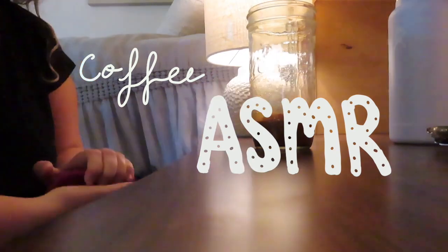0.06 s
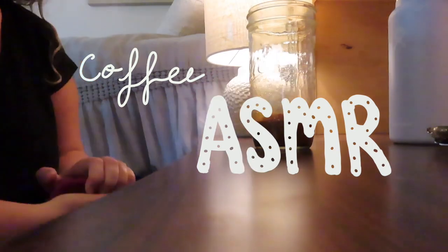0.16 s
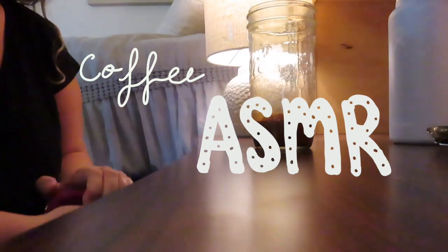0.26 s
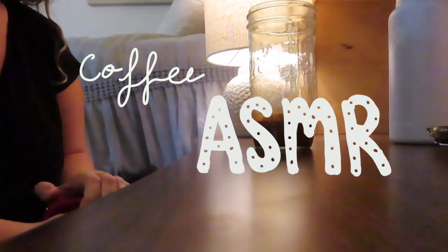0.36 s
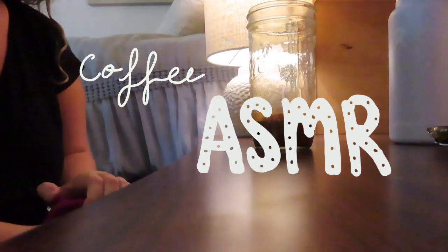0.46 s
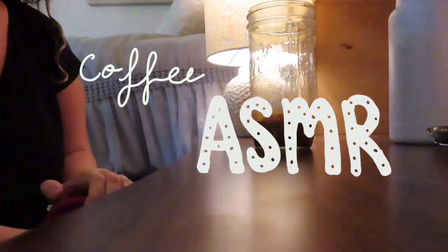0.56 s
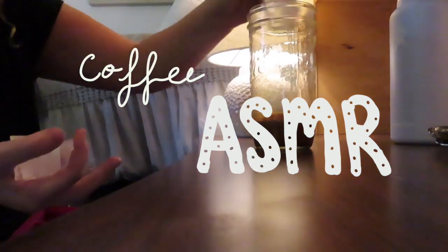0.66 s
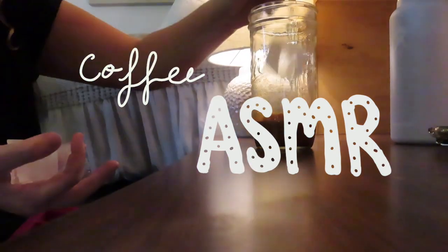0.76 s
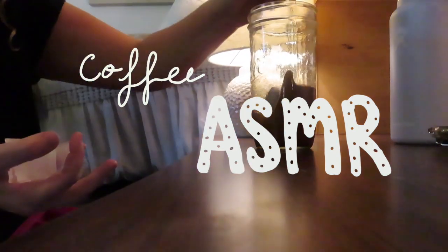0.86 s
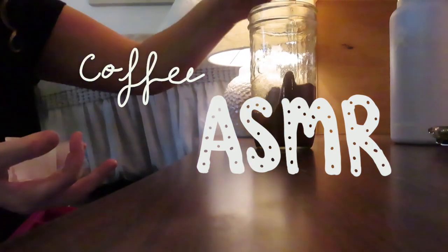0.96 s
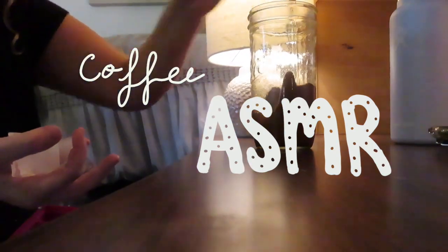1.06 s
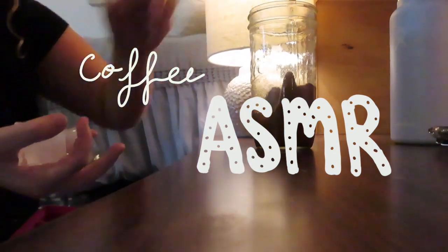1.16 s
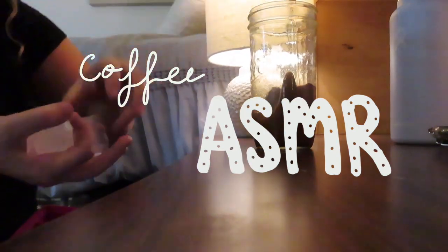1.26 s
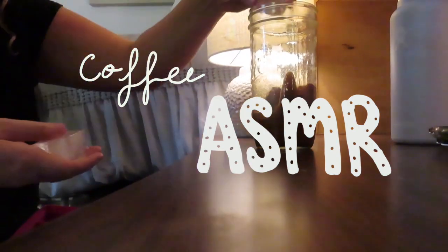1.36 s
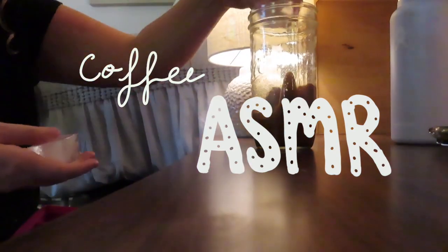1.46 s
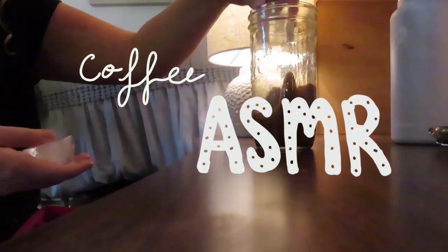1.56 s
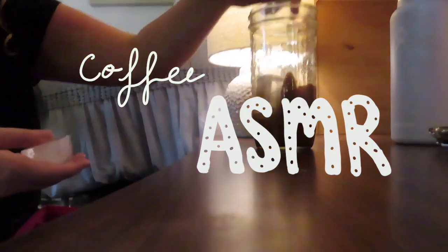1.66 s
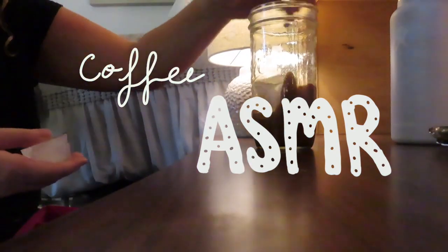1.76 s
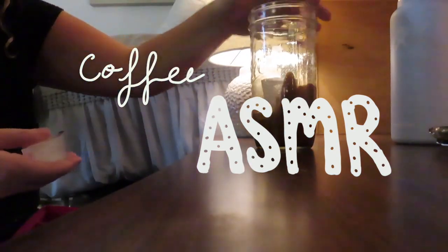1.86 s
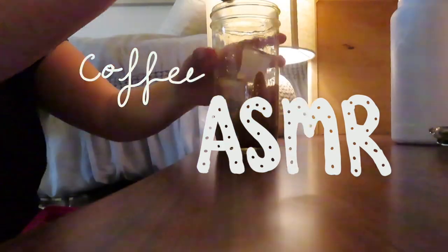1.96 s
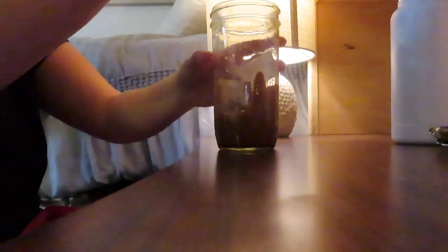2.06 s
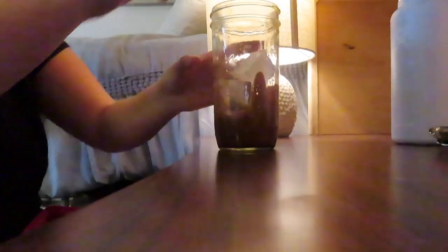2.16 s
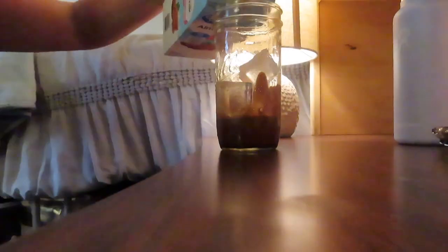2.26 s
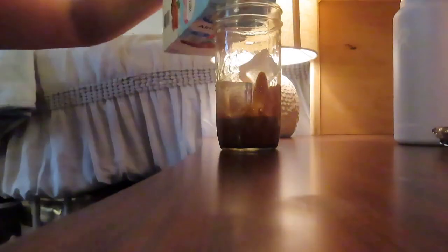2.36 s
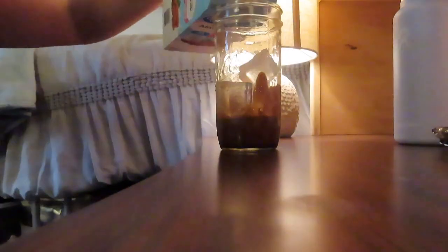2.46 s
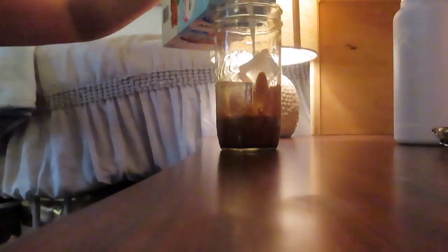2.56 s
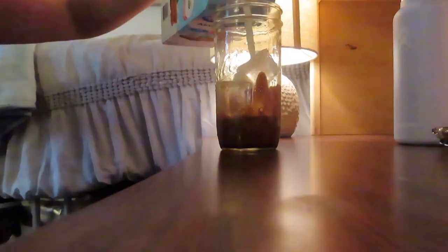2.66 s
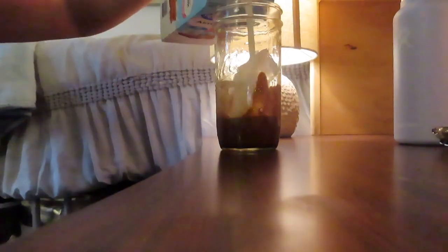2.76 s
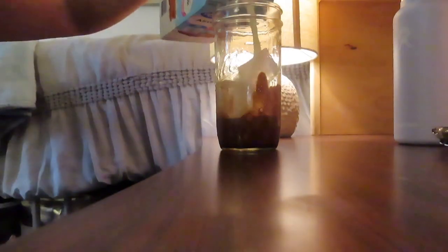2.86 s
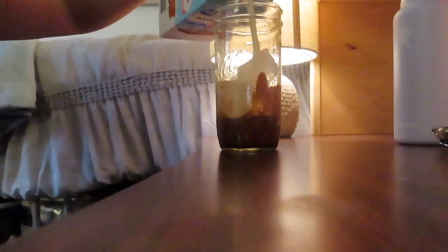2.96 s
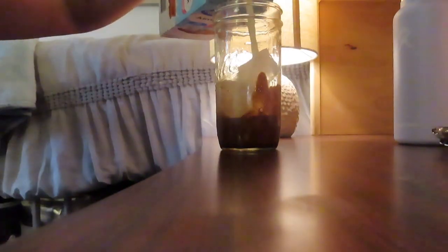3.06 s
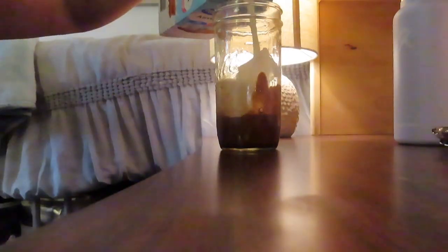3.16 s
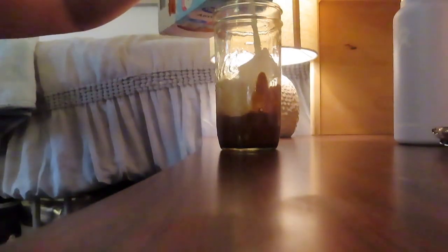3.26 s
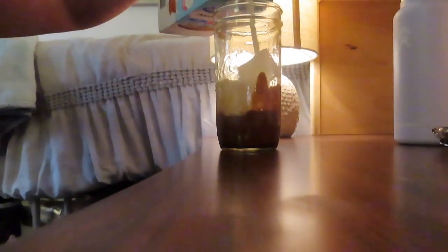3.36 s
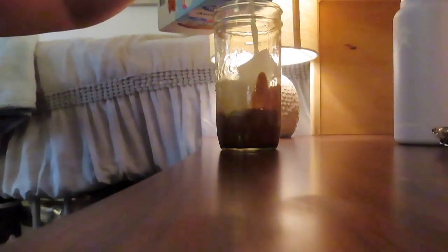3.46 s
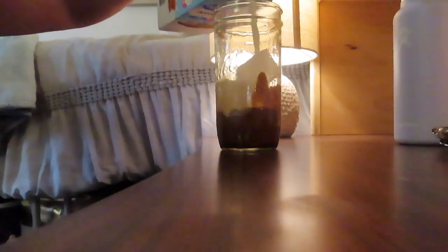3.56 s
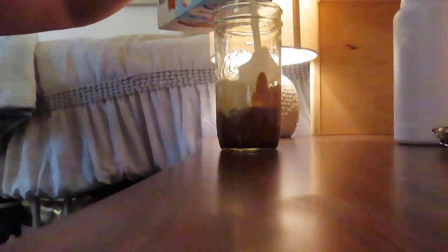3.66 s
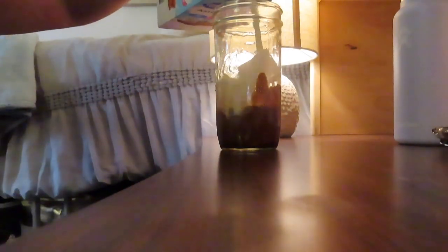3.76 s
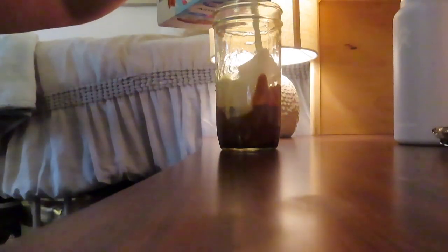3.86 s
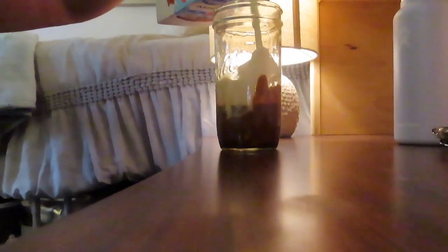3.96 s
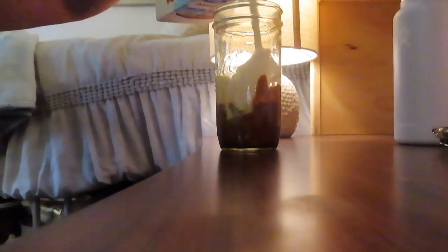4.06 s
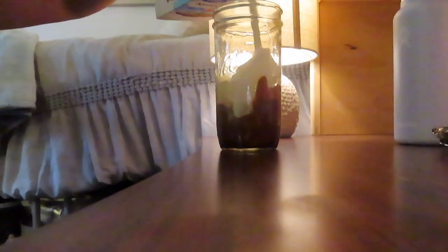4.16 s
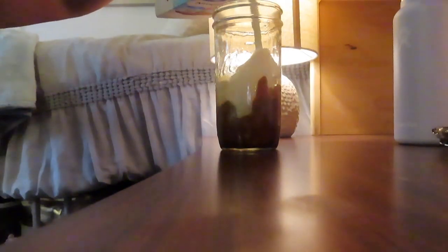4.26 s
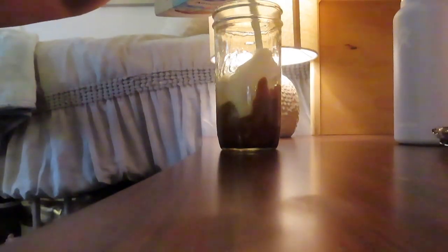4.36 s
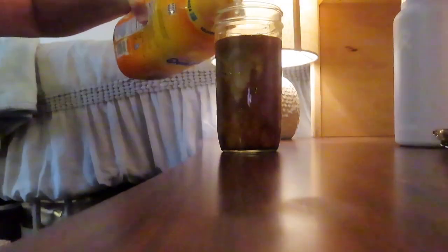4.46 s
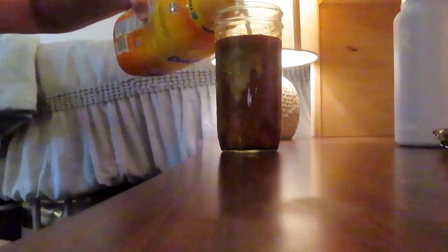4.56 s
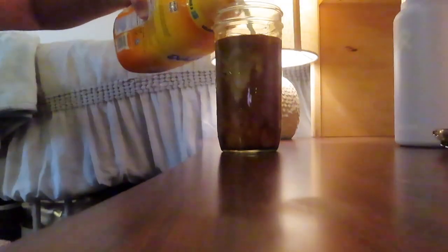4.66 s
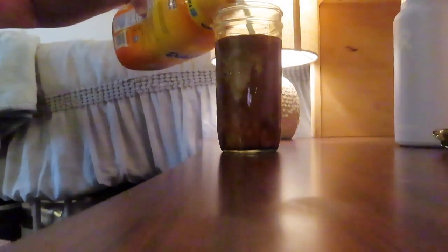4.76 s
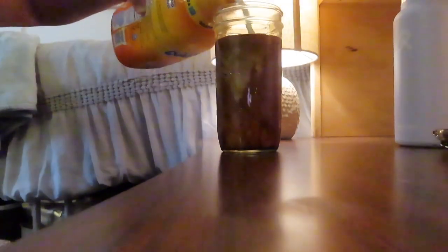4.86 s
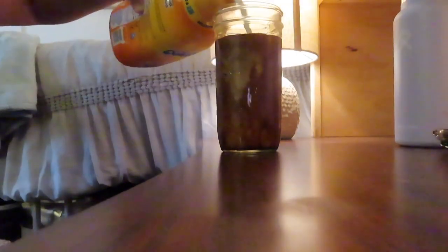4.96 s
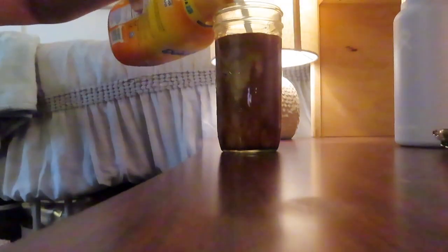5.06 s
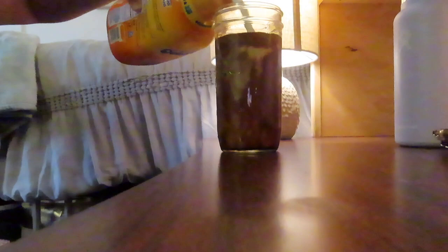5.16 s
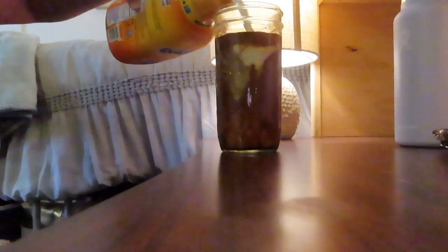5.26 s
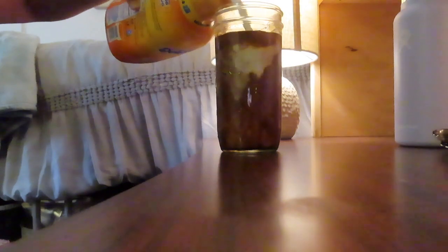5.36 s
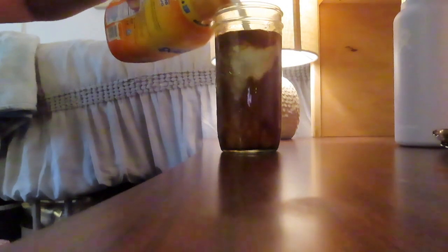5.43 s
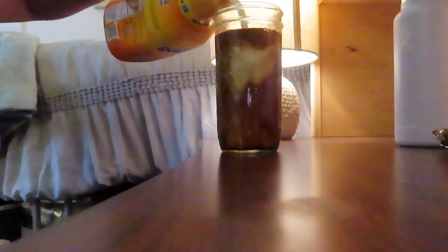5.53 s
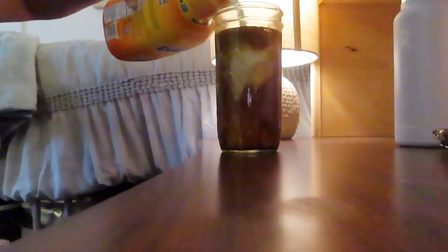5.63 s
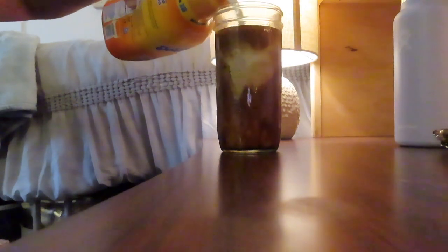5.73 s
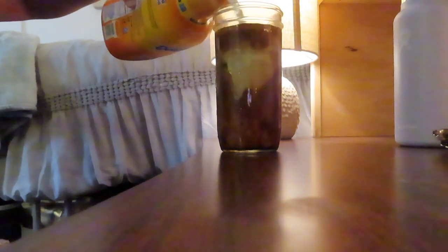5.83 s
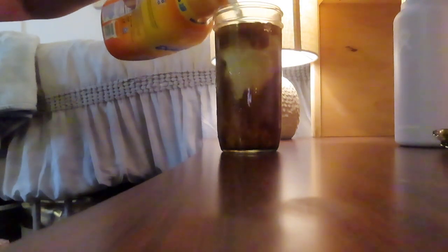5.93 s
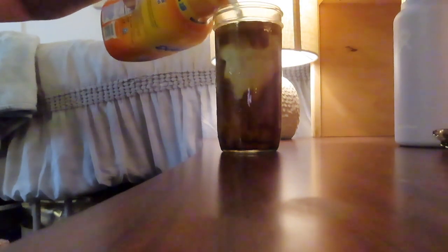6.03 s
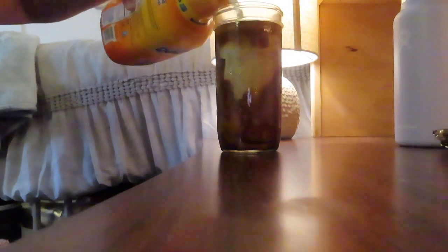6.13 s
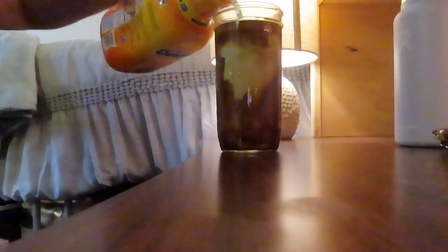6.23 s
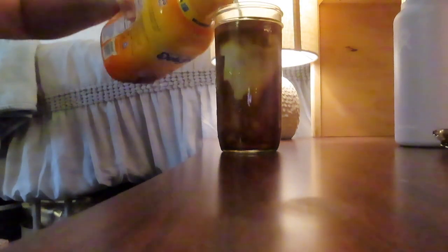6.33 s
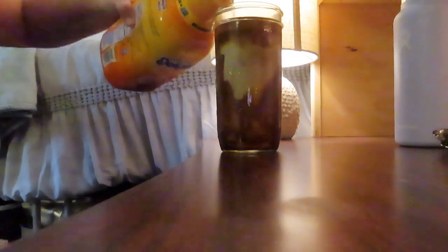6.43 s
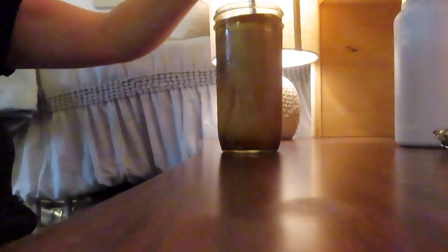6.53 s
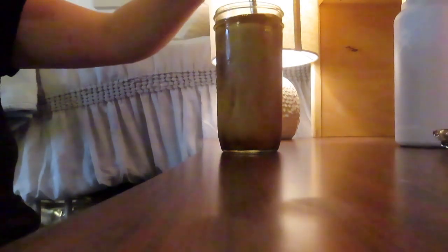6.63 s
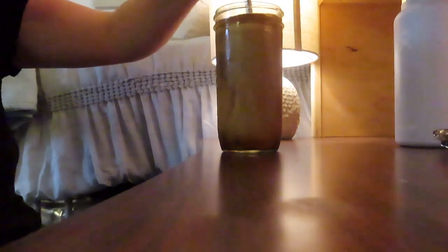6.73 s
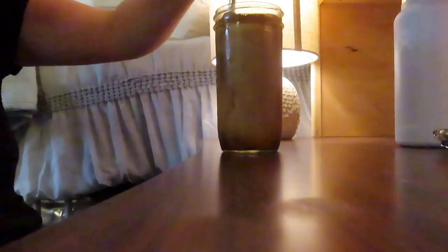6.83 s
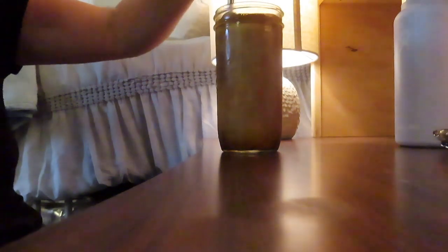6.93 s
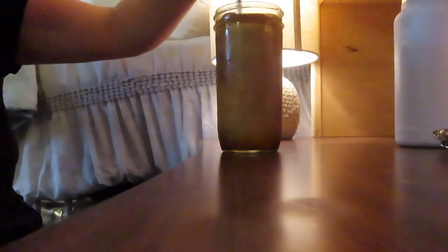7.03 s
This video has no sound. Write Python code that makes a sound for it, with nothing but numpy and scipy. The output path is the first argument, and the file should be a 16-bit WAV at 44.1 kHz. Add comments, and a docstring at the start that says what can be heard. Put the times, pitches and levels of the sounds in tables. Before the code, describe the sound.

Close ice cracks, two ringing drops into a glass jar, faint bubbles and snaps, then a few wooden knocks in a small humming room.

```python
"""Ice cubes in a glass jar

Ice cubes clack loose and drop into a glass jar on a wooden desk, close to the microphone.
They knock on the bottom and ring the glass wall: noise clicks are filtered and joined by fading tones.
Milk runs into the coffee almost silently: a few bubbles are rising tones, tiny snaps are short noise.
Things are set down on the desk with dry knocks. A fan hums in the small room: shaped noise and steady tones."""
import sys
import numpy as np
from scipy import signal
from scipy.fft import rfft, irfft
from scipy.io import wavfile

SR = 44100
rng = np.random.default_rng(int(sys.argv[2]) if len(sys.argv) > 2 else 0)


def materialize(psi):
    """Save the field psi as 16-bit PCM at rate SR to the path in sys.argv[1].

    A 1-D psi becomes a single channel; in a 2-D psi each row is a channel.
    """
    bounded = np.clip(np.atleast_2d(psi).T, -1, 1)
    quanta = np.round(bounded * 32767).astype(np.int16)
    wavfile.write(sys.argv[1], SR, quanta)


N = 312889
TIME = np.arange(N) / SR  # seconds through the whole scene
AGE = TIME[:SR // 2]  # seconds since one short sound began


def amp(db):
    """Turns decibels into gain."""
    return 10 ** (np.asarray(db) / 20)


def unit(x):
    """Scales a sound to an rms of 1."""
    return x / np.sqrt(np.mean(x ** 2) + 1e-20)


def noise():
    """White noise as long as one short sound."""
    return rng.standard_normal(len(AGE))


def read(points, hz):
    """Reads a table between its points, on a log-frequency axis."""
    f, value = np.transpose(points)
    return np.interp(np.log(hz + 1), np.log(f + 1), value)


def add(track, s, sound):
    """Mixes a sound into the track at s seconds."""
    part = track[max(round(s * SR), 0):][:len(sound)]
    part += sound[:len(part)]


def fade(t60):
    """A free decay: it falls by 60 dB in t60 seconds, with a floor of 2 ms on that time."""
    return 10 ** (-3 * AGE / np.maximum(t60, 0.002))


def tone(hz):
    """A sine that starts at a random phase."""
    return np.sin(2 * np.pi * (hz * AGE + rng.random()))


def band(x, hz, kind, order=2):
    """Low-, high- or band-pass filter that never sounds ahead of its input."""
    sections = signal.butter(order, np.minimum(hz, SR / 2 - 1), kind, fs=SR, output="sos")
    return signal.sosfilt(sections, x)


def colour(x, spectrum, size=4096):
    """Gives a sound the listed spectrum with a filter that responds as early as it can."""
    hz = abs(np.fft.fftfreq(size, 1 / SR))
    log_gain = np.log(amp(np.maximum(read(spectrum, hz), -90)))
    # the Hilbert transform supplies the minimum phase
    response = np.fft.ifft(np.exp(np.conj(signal.hilbert(log_gain)))).real[:size // 2]
    return signal.fftconvolve(x, response)[:len(x)]


def at_level(x, db, size=441):
    """Sets the rms level of a sound's first 10 ms."""
    return amp(db) * x / np.sqrt(np.mean(x[:size] ** 2) + 1e-20)


def blow(spectrum, modes, t60, scatter_db, modes_db, grain_db=0):
    """A hit body: a click, a dense wash of dying vibration that may be grainy, and clear ringing modes."""
    grain = amp(grain_db * np.clip(unit(band(noise(), 506, "low")), -2, 2))
    scatter = noise() * fade(t60) * grain
    scatter = amp(scatter_db) * scatter / np.linalg.norm(scatter)
    click = colour((AGE == 0) + scatter, spectrum)
    ring = sum(amp(db) * fade(life) * tone(hz) for hz, db, life in modes)
    ring = ring * (1 - fade(0.035))  # the modes build up gradually
    return at_level(click, 0) + at_level(ring, modes_db)


CRACK_T60 = 0.086  # decay of the clack's wash (s)
CRACK_GRAIN_DB = 2.5  # breaking ice crackles unevenly
# Ice cracking loose. Each row: start in seconds, body level in dB before a fixed trim, treble level in dB.
CRACKS = [(0.031, -35, -45), (0.09, -35, -30.5), (0.101, -15, -27), (0.188, -8, -30), (0.2, -21, -42),
          (0.296, -19, -29), (0.309, -28, -37), (0.338, -8.5, -46), (0.348, 0, -35), (0.362, -5, -21.5),
          (0.37, -25, -48), (0.45, -25, -60)]
# Colour of the ice clicks. Each row: frequency in Hz, relative level in dB.
ICE_COLOUR = [(120, -42), (200, -48), (394, -13), (590, -1), (1060, -6.5), (1320, -8), (1500, -0.5),
              (1870, -0.5), (2090, 1), (2860, -4.5), (4430, -14), (8270, -12.5), (9930, -15),
              (11300, -13.5), (16000, -24)]
# Ringing notes of the ice. Each row: frequency in Hz, relative level in dB, 60 dB decay time in seconds.
ICE_MODES = [(592, 5.5, 0.082), (886, -29, 0.14), (1030, -38, 0.25), (2005, 0.5, 0.18), (2140, 3, 0.077),
             (2560, -17, 0.077), (2840, -4.5, 0.03), (3000, -9, 0.021)]


def ice_cracks():
    """Cubes break loose: a hollow clack of ringing ice with a shorter, bright snap on top."""
    out = np.zeros(N)
    for s, body_db, treble_db in CRACKS:
        clack = blow(ICE_COLOUR, ICE_MODES, CRACK_T60,
                     scatter_db=8.5, modes_db=-20, grain_db=CRACK_GRAIN_DB)
        snap = blow(ICE_COLOUR, ICE_MODES, CRACK_T60 * 0.51,
                    scatter_db=6, modes_db=-35, grain_db=CRACK_GRAIN_DB)
        add(out, s, at_level(band(clack, 3400, "low"), body_db - 10.5))
        add(out, s, at_level(band(snap, 4550, "high", order=4), treble_db))
    return out


BOOM_LONGER = 1.23  # the boom's wash dies this many times more slowly than the knock's
THUD_TICK_DB = -18  # treble, relative to strength
# Cubes landing on the jar's bottom; the row at 0.679 is the first landing's lingering boom.
# Each row: start in seconds, strength in dB before a fixed trim, boom level in dB,
# 60 dB decay time of the knock's wash in seconds.
THUDS = [(0.644, 2, -15.5, 0.023), (0.679, -37, -23, 0.66), (0.853, -12.5, -21.5, 0.061),
         (0.868, -16.5, -23.5, 0.05), (0.915, -28, -28.5, 0.31), (1.691, 3.5, -14, 0.05),
         (1.712, -6, -27, 0.094), (1.775, -8, -24, 0.12), (1.861, -22.5, -21, 0.069),
         (1.915, -18.5, -28.5, 0.043), (1.997, -8.5, -20.5, 0.12), (2.042, -13, -21.5, 0.05),
         (2.067, -9.5, -19.5, 0.035)]
# Colour of the jar and desk top together. Each row: frequency in Hz, relative level in dB.
BASE_COLOUR = [(35, -33), (60, -3.5), (212, -13.5), (315, 10.5), (503, -6), (862, 2), (1010, -10),
               (1310, -5.5), (1780, 0), (2090, -12), (3760, -17), (5210, -34), (5590, -26.5), (12700, -40),
               (16000, -41)]
# Their ringing notes. Each row: frequency in Hz, relative level in dB, 60 dB decay time in seconds.
BASE_MODES = [(90, -2, 0.08), (134, -1.5, 0.15), (195.5, -8, 0.15), (274, -2, 0.089), (345.7, 0.5, 0.11),
              (488, 0, 0.087), (596.6, 4, 0.093), (641, -14.5, 0.38), (910, 7, 0.052), (1210, -4.5, 0.086),
              (1598, 2.5, 0.042)]


def thuds():
    """A cube lands and jar and desk top boom together; strength lifts the knock and treble over the boom."""
    out = np.zeros(N)
    for s, db, boom_db, t60 in THUDS:
        boom = blow(BASE_COLOUR, BASE_MODES, t60 * BOOM_LONGER, scatter_db=13, modes_db=0)
        knock = blow(BASE_COLOUR, BASE_MODES, t60, scatter_db=1.5, modes_db=-8.5)
        tick = blow(BASE_COLOUR, BASE_MODES, t60, scatter_db=-3.5, modes_db=-42)
        add(out, s, at_level(band(boom, [70, 560], "band"), boom_db))
        add(out, s, at_level(band(knock, [620, 1650], "band"), db - 12))
        add(out, s, at_level(band(tick, 1960, "high"), db + THUD_TICK_DB))
    return out


def dulled_db(contact, corner):
    """Loss of high-pitched sound when a contact lasts longer than the corner time."""
    return -10 * np.log10(1 + (contact / corner) ** 2)


CHATTER_PER_S, CHATTER_DB, CHATTER_T60 = 250, -16, 0.28  # bounces per second, level in dB, decay in s


def chatter():
    """After a touch the cube chatters: a dying train of tiny bounces shakes the higher modes again."""
    bounces = noise() * (rng.random(len(AGE)) < CHATTER_PER_S / SR)
    return (AGE == 0) + amp(CHATTER_DB) * bounces * fade(CHATTER_T60)


NOTE_HZ, BEAT_HZ = 1785, 13.2  # the wall's lowest mode, and how far its twin lies above it
BRUSH_S = 0.04  # a brushing contact this long wakes the twin fully, so the ring beats
SINK_PER_S = 2  # a cube works its way from the rim (0) to the low wall (1) at this speed
TICK_DB, TICK_CONTACT_S = -14, 0.0025  # tick relative to the lowest mode; longer contacts lose it
TOP_DB, TOP_CONTACT_S = -2.5, 0.0033  # trim of modes above 6.5 kHz; longer contacts dull them
PARTNER, DETUNE_HZ = 0.47, 18  # each higher mode has a weaker partner, randomly detuned
CLATTER_DB, CLATTER_T60 = -12, 0.076  # clatter relative to the higher modes, and its decay in s
# Each entry: the time in seconds when a cube first meets the rim.
RELEASES = [0.57, 1.5]
# Ice against the glass wall. Each row: start in seconds, lowest mode's level in dB,
# its 60 dB decay time in seconds, higher modes' level in dB, contact time in seconds.
CLINKS = [(0.644, -14.5, 0.78, -37, 0.0012), (0.684, -20, 0.76, -35, 0.0016),
          (0.731, 0, 0.1, -25.5, 0.0019), (0.768, -2.5, 0.13, -26.5, 0.00088),
          (0.797, -15.5, .5, -15.5, 0.012), (0.823, -1, 0.2, -15.5, 0.0059),
          (0.904, -11.5, .24, -34, 0.025), (1.573, -7.5, 0.48, -39, 0.00043),
          (1.631, -6, 0.27, -35.5, 0.00055), (1.691, -19, 0.39, -52, 0.0011),
          (1.756, -22.5, 0.3, -25.5, 0.0013), (1.774, -5, 0.69, -27, 0.00037),
          (1.915, -23.5, 0.2, -32, 0.0023), (1.936, -14.5, 0.24, -44, 0.0055),
          (1.995, -12, 0.047, -36, 0.0018), (2.013, -25.5, .35, -28.5, 0.001),
          (2.044, -18, 0.26, -35, .004), (2.068, -13, 0.04, -36.5, 0.002), (2.112, -54, 0.25, -51, .001)]
# The wall's higher modes. Each row: frequency in Hz, relative level in dB when struck at the rim,
# relative level in dB when struck low on the wall, 60 dB decay time in seconds.
GLASS_MODES = [(2614, -25, 5, 0.074), (4070, -10, -8, 0.16), (4230, -36, -4.5, 0.1), (4422, 4, -0.5, 0.12),
               (5710, 6, -51, 0.088), (7700, -12, 2, 0.028), (8030, -3, -8, 0.1), (8770, -13, -10, 0.058),
               (9530, -1, -18, .11), (10900, 5, -18.5, 0.039), (11950, -16, -3, 0.041),
               (13150, -18, -10, 0.041)]


def jar():
    """Each touch stops the wall's old ring and starts a new one; short contacts are bright, long ones soft."""
    out = np.zeros(N)
    next_touch = [row[0] for row in CLINKS[1:]] + [N / SR]
    turns = 2 * np.pi * AGE
    # colour of the contact tick (Hz, relative dB)
    tick_colour = [(300, -24), (1200, -45), (1900, 20.5), (2700, 7.5),
                   (4200, -3.5), (6000, -10.5), (12000, -19), (16000, -41)]
    for (s, note_db, t60, higher_db, contact), end in zip(CLINKS, next_touch):
        released = min(RELEASES, key=lambda at: abs(s - at))
        place = np.clip(SINK_PER_S * (s - released), 0, 1)
        twin = min(contact / BRUSH_S, 1)
        lowest = np.sin(NOTE_HZ * turns) - twin * np.sin((NOTE_HZ + BEAT_HZ) * turns)
        ring = amp(note_db) * fade(t60) * lowest

        top_db = TOP_DB + dulled_db(contact, TOP_CONTACT_S)
        higher = np.zeros(len(AGE))
        for hz, rim_db, wall_db, life in GLASS_MODES:
            level_db = higher_db + rim_db + place * (wall_db - rim_db)
            if hz > 6500:
                level_db += top_db
            pair = tone(hz) + PARTNER * tone(hz + DETUNE_HZ * rng.standard_normal())
            higher += amp(level_db) * fade(life) * pair
        ring += signal.fftconvolve(higher, chatter())[:len(AGE)]

        # the cube clatters briefly along the wall
        clatter = unit(band(noise(), [2000, 4300], "band", order=3)) * fade(CLATTER_T60)
        ring += amp(higher_db + CLATTER_DB) * clatter

        # the ring builds up during contact and is damped within 2.2 ms of the next touch
        ring *= np.clip(AGE / max(contact, 1 / SR), 0, 1)
        ring *= np.clip((end - s - AGE) / 0.0022 + 1, 0, 1)

        tick = colour((AGE == 0) + 0.045 * noise() * fade(0.06), tick_colour)
        tick_db = note_db + TICK_DB + 2 * dulled_db(contact, TICK_CONTACT_S)
        add(out, s, ring + at_level(tick, tick_db))
    return out


HOLLOW_HZ, HOLLOW_T60 = 422, 0.11  # hollow note of the desk, and its decay in s
# Things put down on the desk. Each row: start in seconds, then body, bass and treble levels in dB before
# fixed trims, 60 dB decay time of the wash in seconds, hollow note's level in dB before its envelope.
KNOCKS = [(6.568, -1.5, -14, -15.5, 0.013, -28), (6.585, -19, -20, -22.5, 0.23, -25),
          (6.8549, -15, -16, -24.5, 0.039, -12), (6.929, -11, -16, -28.5, 0.027, -19)]
# Colour of the desk. Each row: frequency in Hz, relative level in dB.
DESK_COLOUR = [(35, -40), (60, -37), (113, -5.5), (308, 0.5), (417, 3.5), (715, -4.5), (882, 0), (1060, -4),
               (1620, -0.5), (2580, -8.5), (4220, -20), (7230, -55), (8920, -30), (13900, -47),
               (16000, -67)]
# Ringing notes of the desk. Each row: frequency in Hz, relative level in dB, 60 dB decay time in seconds.
DESK_MODES = [(130, -3.5, 0.17), (340, -17, 0.082), (634, -3, 0.21), (768, -9, 0.1), (880, 3, 0.099),
              (1287, -7, 0.061), (1500, -8, 0.029), (1650, 13, 0.019), (2400, -30, 0.056)]


def knocks():
    """Dry knocks make the desk vibrate, with a hard edge on top and a hollow note of varying strength."""
    out = np.zeros(N)
    edge_colour = [(2000, -7), (3500, -0.5), (5200, -7), (7000, -4.5),
                   (9500, -3), (13000, -16), (16000, -17)]  # (Hz, dB)
    for s, body_db, bass_db, treble_db, t60, hollow_db in KNOCKS:
        thud = blow(DESK_COLOUR, DESK_MODES, t60, scatter_db=4.5, modes_db=-10.5)
        edge = colour((AGE == 0) + 0.031 * noise() * fade(0.052), edge_colour)
        hollow = tone(HOLLOW_HZ) * fade(HOLLOW_T60) * (1 - fade(0.011))
        add(out, s, at_level(band(thud, [100, 480], "band"), bass_db - 4))
        add(out, s, at_level(band(thud, [650, 2800], "band"), body_db - 5))
        add(out, s, at_level(band(edge, 3000, "high"), treble_db - 15.5))
        add(out, s, amp(hollow_db) * hollow)
    return out


FAINT_SPREAD_DB, FAINT_SPREAD_OCTAVES = 3, 0.19  # largest random shift either way
# The two entries are the start and end of the pour in seconds.
POUR_S = (2.6, 4.45)


def sprinkle(db, hz, count):
    """Faint events at random over the pour, as rows of seconds, dB and Hz."""
    when, size, pitch = rng.uniform(-1, 1, (count, 3)).T
    times = np.interp(when, [-1, 1], POUR_S)
    return list(zip(times, db + FAINT_SPREAD_DB * size, hz * 2 ** (FAINT_SPREAD_OCTAVES * pitch)))


GLIDE = 0.82  # a bubble's pitch rises by twice this fraction per second
FAINT_BUBBLE_DB, FAINT_BUBBLE_HZ = -52, 3170  # centre of the random spread
FAINT_SNAP_DB, FAINT_SNAP_HZ = -60, 8750
# The clearest bubbles at the milk's surface.
# Each row: start in seconds, level in dB before envelope and splutter, starting pitch in Hz.
BUBBLES = [(3.1338, -43, 2960), (3.2465, -44, 2560), (3.6758, -25.5, 2533), (4.057, -38, 4550),
           (4.346, -40, 2900), (4.369, -45, 3200)]
# The clearest snaps and splats as liquid runs over the ice.
# Each row: start in seconds, level in dB before a fixed trim, rough pitch in Hz.
SNAPS = [(3.019, -46, 8350), (3.183, -49, 9600), (3.692, -47, 11300), (3.745, -47, 10400),
         (4.057, -43, 4500), (4.345, -53, 8500), (4.363, -44, 3300), (4.413, -46.5, 7300),
         (4.441, -31, 2300), (4.649, -51, 7350)]


def milk():
    """A smooth, thin stream: only rising, spluttering bubble tones and noisy snaps from the ice are heard."""
    out = np.zeros(N)
    for s, db, hz in BUBBLES + sprinkle(FAINT_BUBBLE_DB, FAINT_BUBBLE_HZ, count=5):
        splutter = 1 + 0.39 * unit(band(noise(), 350, "low"))
        bubble = np.sin(2 * np.pi * hz * AGE * (1 + GLIDE * AGE)) * fade(0.063) * (1 - fade(0.018))
        add(out, s, amp(db) * bubble * splutter)
    for s, db, hz in SNAPS + sprinkle(FAINT_SNAP_DB, FAINT_SNAP_HZ, count=6):
        snap = band(noise() * fade(0.016), [hz * 0.8, hz * 1.15], "band")
        add(out, s, at_level(snap, db - 4))
    return out


AIR_DB = -38.5  # rms level of the air's middle part before its swell
WHINE_HZ, WHINE_DB = 3336, -65.5  # a thin, fluttering whine
THROB_HZ = 108  # the strongest fan tone
THROB_WAVER_DB, THROB_WAVER_HZ = 2, 4.5  # it wavers at random by this rms amount, about this fast
# Colour of the rushing air. Each row: frequency in Hz, relative level in dB.
AIR_COLOUR = [(76, -18), (130, -3.5), (191, -11.5), (215, -5), (248, -10.5), (394, -0.5), (511, -6),
              (601, -7), (735, -11), (796, -12), (1520, -19), (2050, -26.5), (3330, -32), (14500, -52.5),
              (16000, -83)]
# Stereo width of the air. Each row: frequency in Hz, side level minus middle level in dB.
AIR_SIDE = [(60, -17), (110, -38), (200, -12), (380, -19), (700, -12.5), (1290, -12), (2380, -5),
            (4400, -2), (8120, -1.5), (15000, -4)]
# Slow swell of the air. Each row: time in seconds, level change in dB.
AIR_SWELL = [(0, -1.5), (1, -3.5), (1.35, -0.5), (2.3, -0.5), (4.4, -0.5), (6.4, -1), (7.09, -2.5)]
# Wavering bands of the fan. Each row: centre frequency in Hz, width in Hz, level in dB.
DRONE = [(37.6, 10, -49), (57, 8, -47), (82.3, 13, -44.5), (142, 18, -66.5), (344, 54, -47.5),
         (595, 40, -53), (2027, 84, -62), (2265, 150, -63.5)]
# Steady fan tones. Each row: frequency in Hz, level in dB before a slight random drift.
HUM = [(224, -46), (269, -55.5), (537.4, -78), (656.4, -51.5), (777.1, -54)]
# Slow level of the strongest fan tone. Each row: time in seconds, level in dB before a fixed lift.
THROB = [(2.5, -48), (2.66, -44.5), (4.0, -40), (4.1, -53), (4.4, -44.5), (5.3, -44.5), (5.8, -36),
         (6.4, -47)]


def fan():
    """Rushing air, narrow wavering bands and motor tones; only the air differs between the ears."""
    hz = np.fft.rfftfreq(N, 1 / SR)

    def shaped_noise(gain):
        """Noise with the given gain at each frequency."""
        return irfft(gain * (rng.standard_normal(len(hz)) + 1j * rng.standard_normal(len(hz))), N)

    def slow(speed_hz):
        """A smooth random wander."""
        return unit(shaped_noise(np.exp(-(hz / speed_hz) ** 2)))

    def motor(f):
        """A tone whose phase and level drift slightly."""
        return np.sqrt(2) * np.sin(2 * np.pi * f * TIME + 0.59 * slow(2.3)) * amp(0.19 * slow(2.3))

    shape = amp(read(AIR_COLOUR, hz))
    mid = shaped_noise(shape)
    side = shaped_noise(shape * amp(read(AIR_SIDE, hz)))
    swell_db = np.interp(TIME, *np.transpose(AIR_SWELL))
    air = amp(AIR_DB + swell_db) * np.array([mid + side, mid - side]) / mid.std()

    drone = np.zeros(N)
    for f, width, db in DRONE:
        drone += amp(db) * unit(shaped_noise(1 / (1 + (2 * (hz - f) / width) ** 2)))
    hum = sum(amp(db) * motor(f) for f, db in HUM)
    throb_db = np.interp(TIME, *np.transpose(THROB)) + 2
    throb = amp(throb_db + THROB_WAVER_DB * slow(THROB_WAVER_HZ)) * motor(THROB_HZ)
    flutter = unit(np.maximum(slow(45) + 1, 0))
    whine = amp(WHINE_DB) * flutter * unit(shaped_noise(np.exp(-((hz - WHINE_HZ) / 100) ** 2)))
    return air + drone + hum + throb + whine


# 60 dB decay time of the room. Each row: frequency in Hz, time in seconds.
ROOM_T60 = [(100, 0.66), (500, 0.41), (2000, 0.28), (6000, 0.19), (15000, 0.09)]


def room(x, wet_db, size=256):
    """A small furnished room: each band of echo dies at its own speed; the two sides differ most in treble."""
    hz, t, z = signal.stft(rng.standard_normal((2, len(AGE))), SR, nperseg=size)
    z = z * amp(-60 * t / read(ROOM_T60, hz)[:, None])
    side_db = [(200, -16.5), (1000, -33.5), (4000, -12), (12000, 4)]  # (Hz, dB)
    z[1] *= amp(read(side_db, hz))[:, None]
    mid, side = signal.istft(z, SR, nperseg=size)[1][:, :len(AGE)] * np.clip(AGE / 0.0025 - 0.5, 0, 1)
    tail = np.array([mid + side, mid - side]) / np.linalg.norm(mid)
    return amp(wet_db) * signal.fftconvolve(x[None], tail, axes=1)[:, :N]


# Phase between the two microphone ports, for the ice cracks and for everything else up close.
# Each row: frequency in Hz, radians by which left leads.
ICE_PHASE = [(100, 1.5), (3500, 0), (5500, 1.9), (7500, 1.17), (11000, 1.47), (15000, 2)]
JAR_PHASE = [(100, 0), (3900, 0.42), (4400, -1.5), (5500, 2), (8000, -15), (10000, 22.5), (11000, 0.4),
             (14000, -2)]


def ports(x, phase):
    """Two close microphone ports hear the same sound with a phase difference that depends on pitch."""
    turn = np.exp(0.5j * read(phase, np.fft.rfftfreq(N, 1 / SR)))
    return irfft(rfft(x) * np.array([turn, 1 / turn]), N)


def scene():
    """Ice, jar, desk and milk in the room, over the fan."""
    cracks, landings, glass, desk, pour = ice_cracks(), thuds(), jar(), knocks(), milk()
    # decibels for left and right: a slight tilt of level towards the right port
    tilt = amp([[-0.7], [0.7]])
    near = ports(cracks, ICE_PHASE) + ports(landings + glass + desk + pour, JAR_PHASE) * tilt
    echo = room(cracks, wet_db=-11.5) + room(landings, wet_db=-16.5) + room(glass, wet_db=-21)
    echo += room(desk, wet_db=-16.5) + room(pour, wet_db=-15)
    return near + echo + fan()


def record(dry):
    """Peaks beyond full scale are clipped flat, then a steep filter removes the highest treble."""
    low_pass = signal.firwin(255, 15700, window=("kaiser", 9), fs=SR)  # edge in Hz
    return signal.oaconvolve(np.clip(dry, -1, 1), low_pass[None], "same")


dry = scene()
out = record(dry)
materialize(out)
```